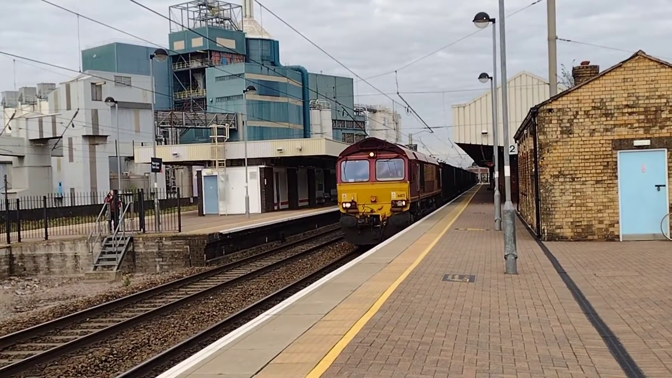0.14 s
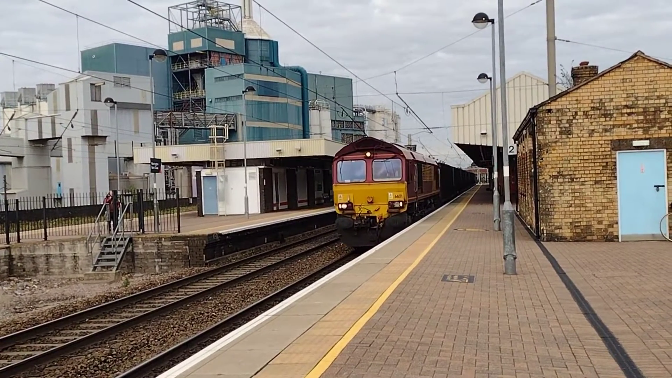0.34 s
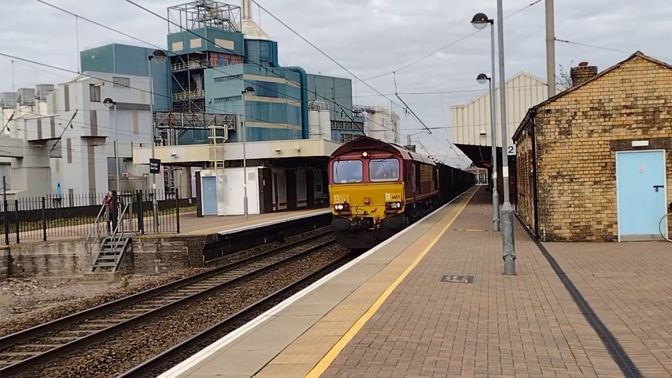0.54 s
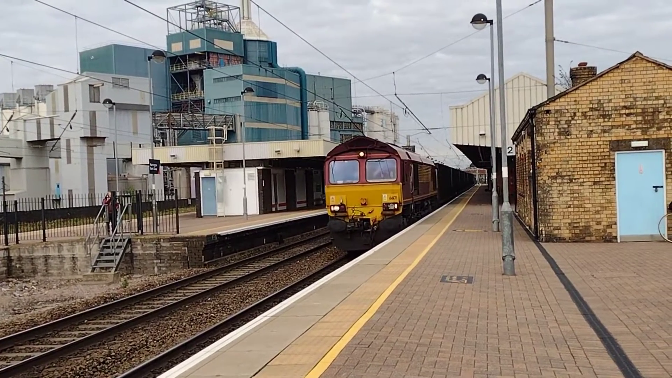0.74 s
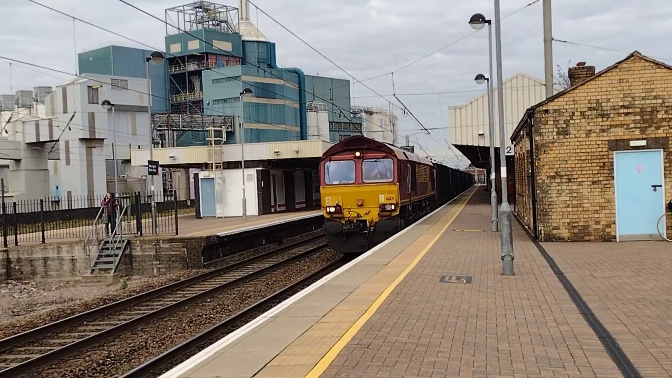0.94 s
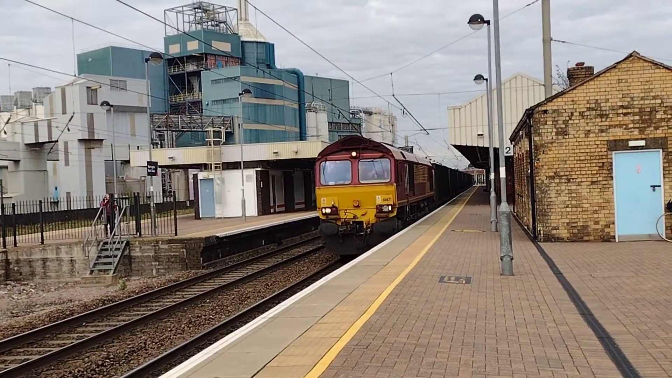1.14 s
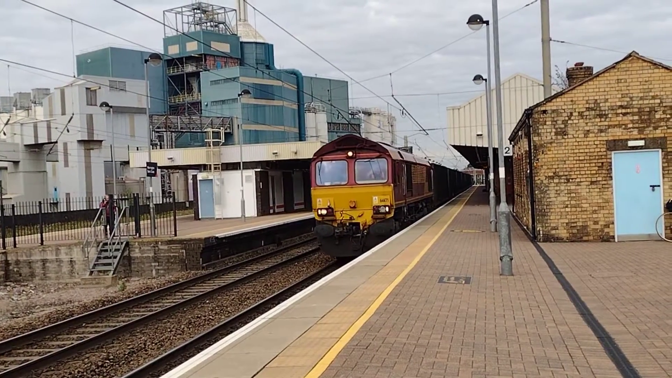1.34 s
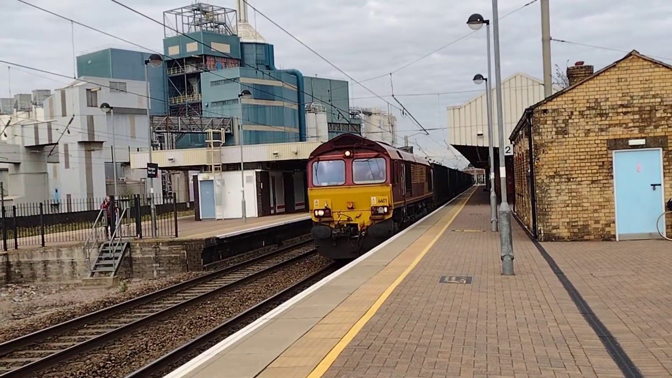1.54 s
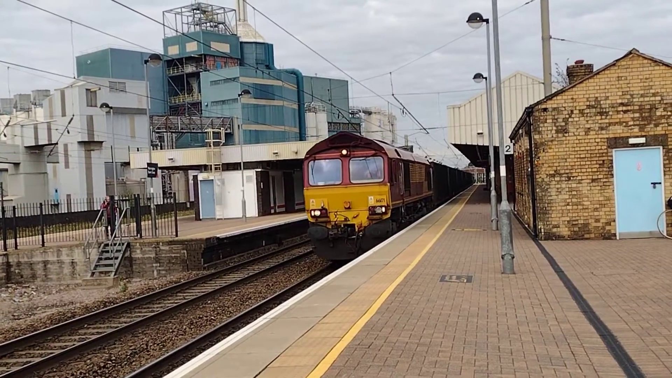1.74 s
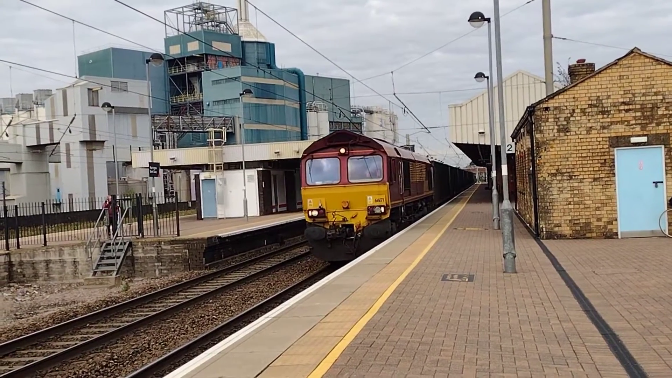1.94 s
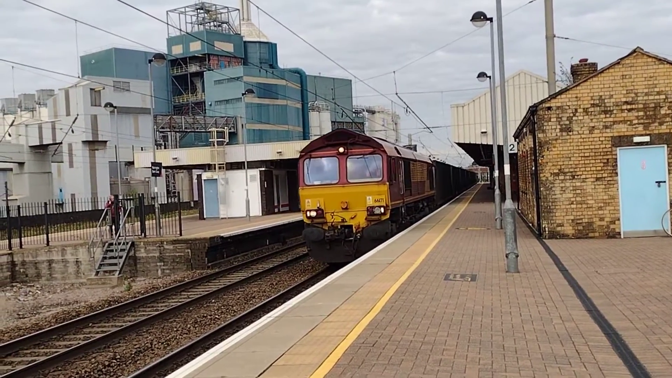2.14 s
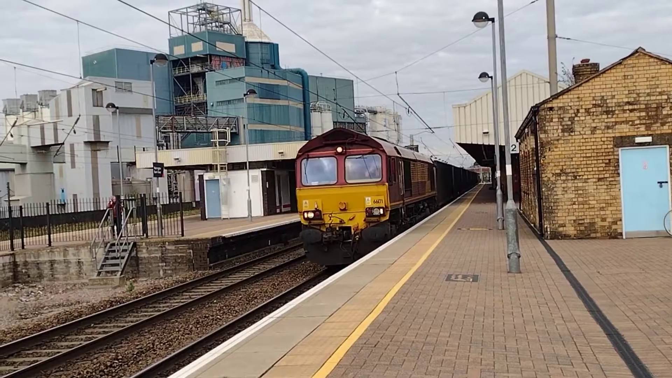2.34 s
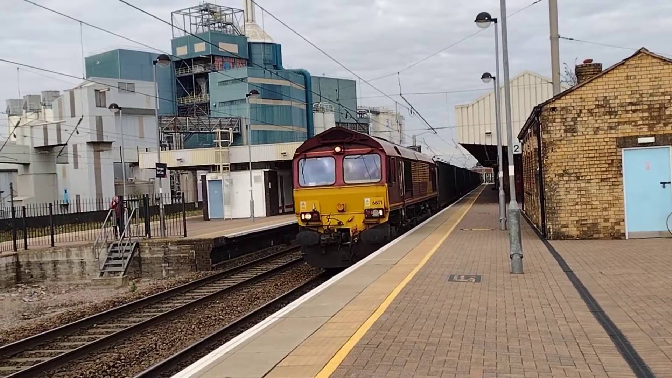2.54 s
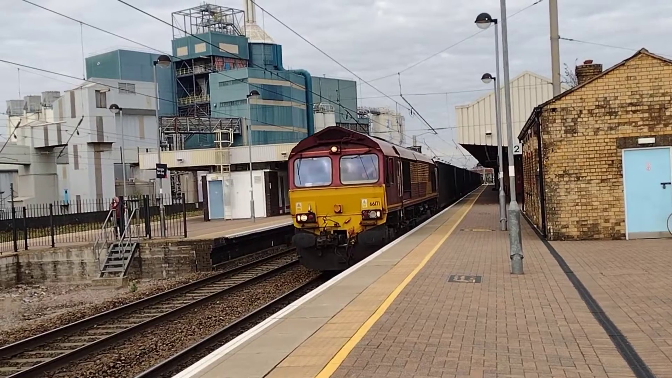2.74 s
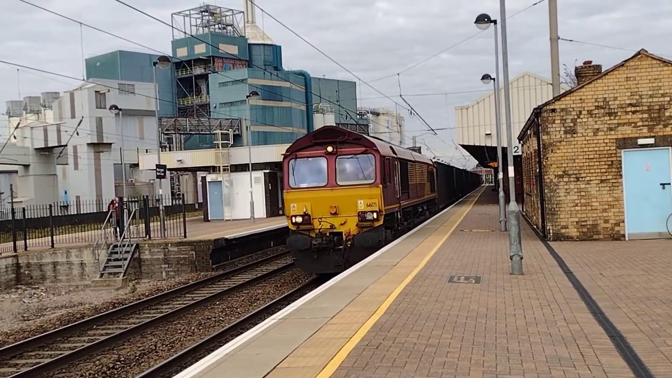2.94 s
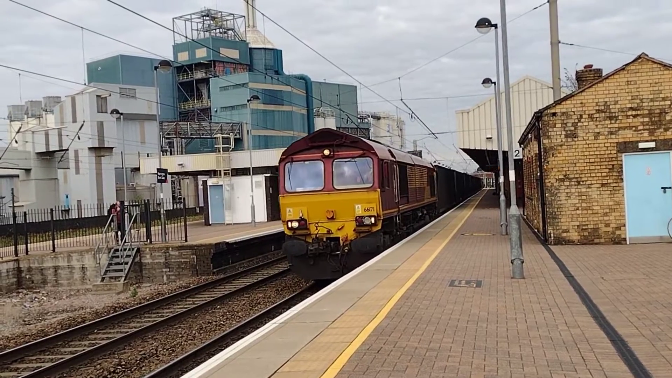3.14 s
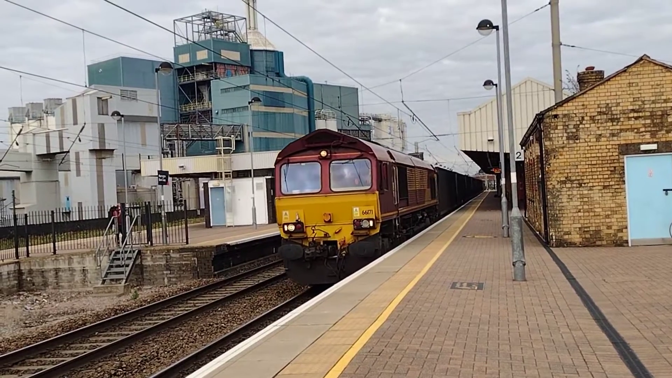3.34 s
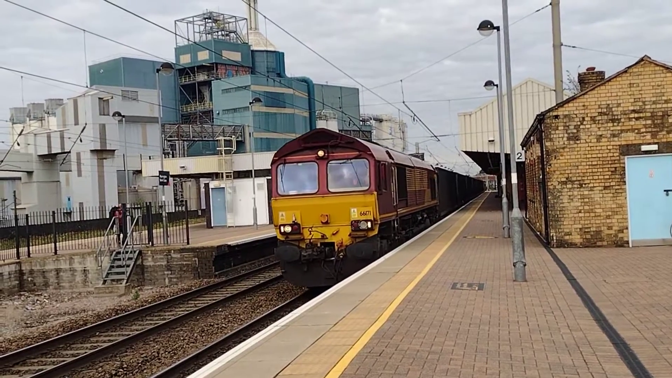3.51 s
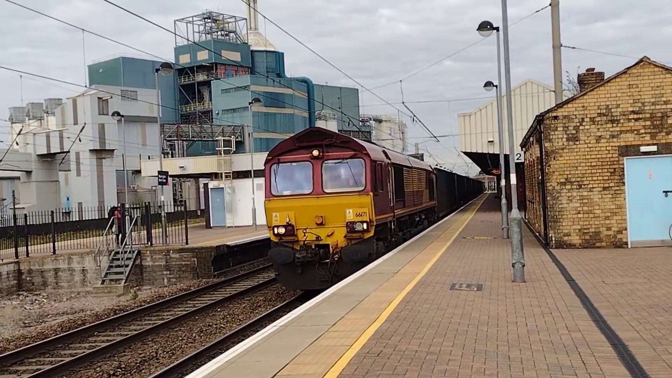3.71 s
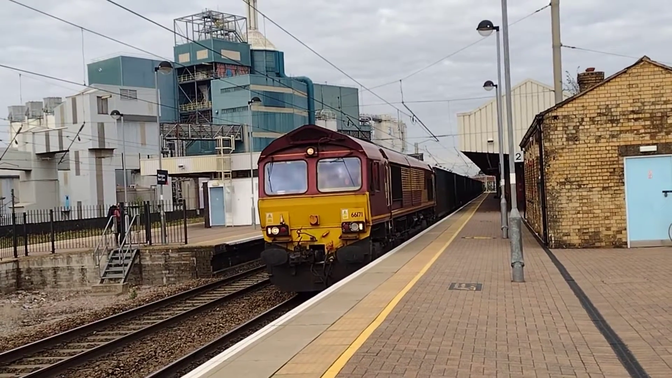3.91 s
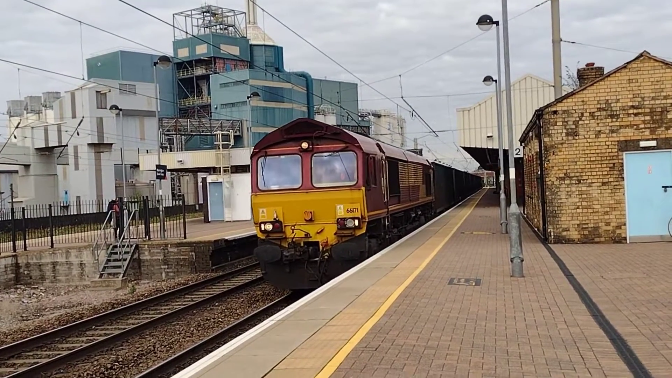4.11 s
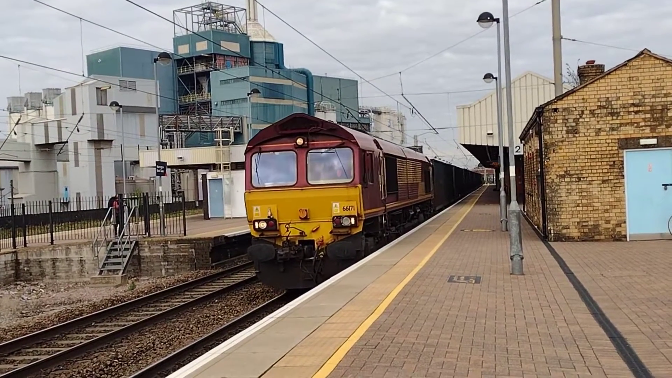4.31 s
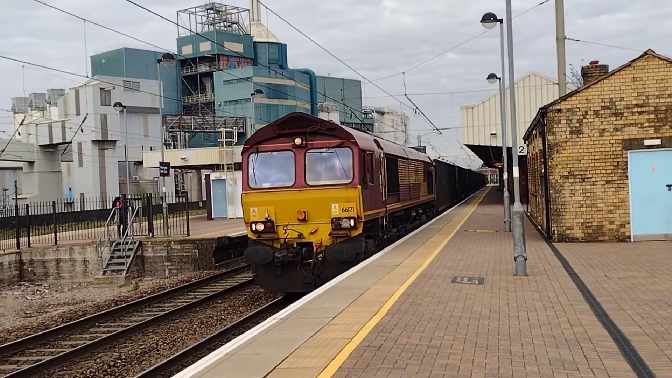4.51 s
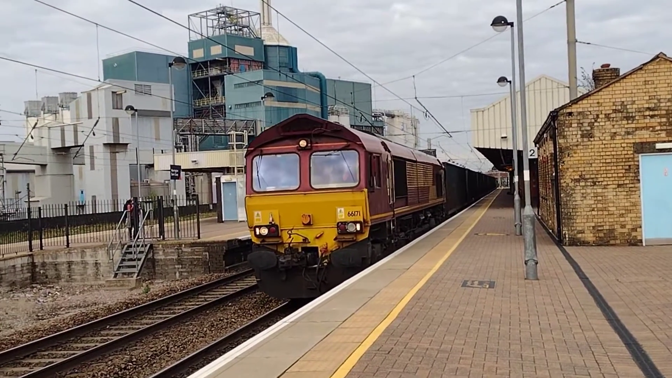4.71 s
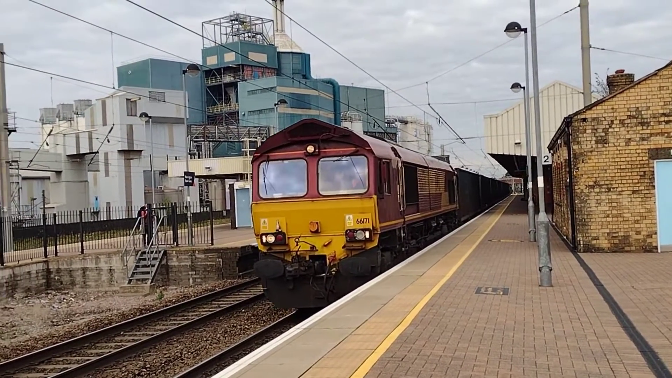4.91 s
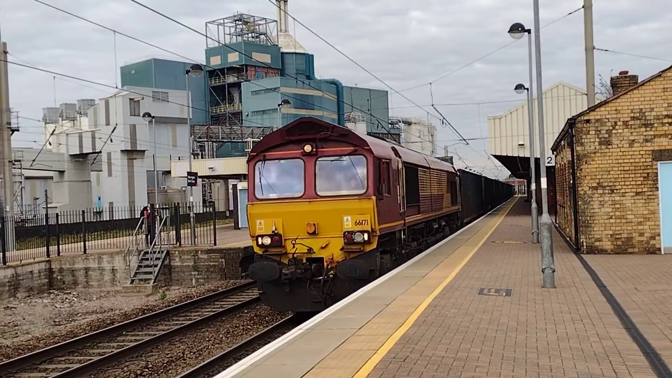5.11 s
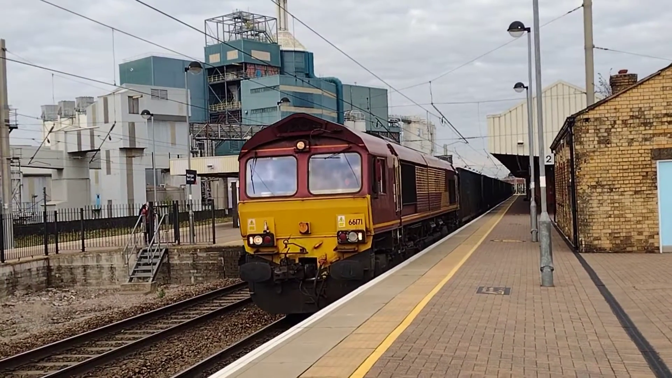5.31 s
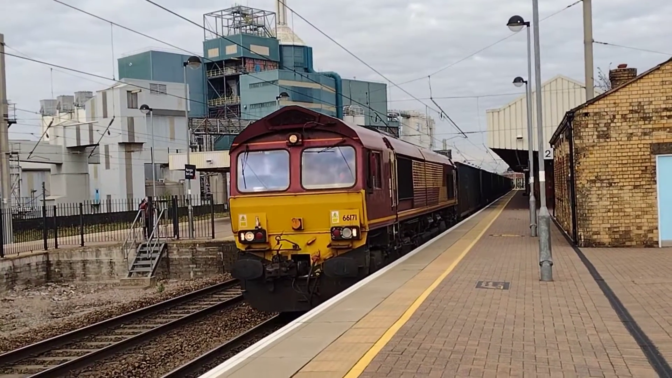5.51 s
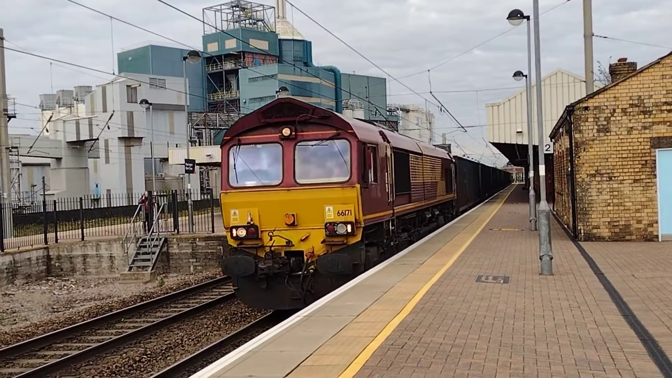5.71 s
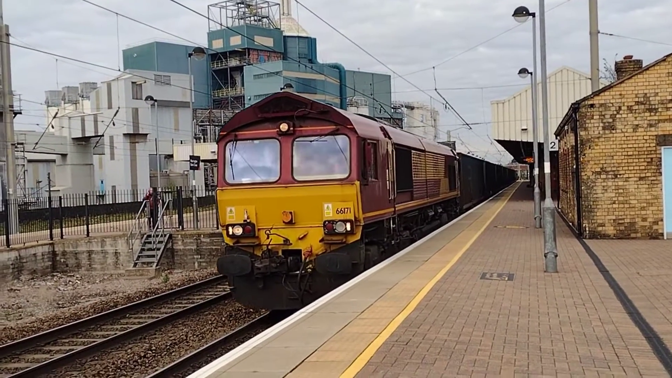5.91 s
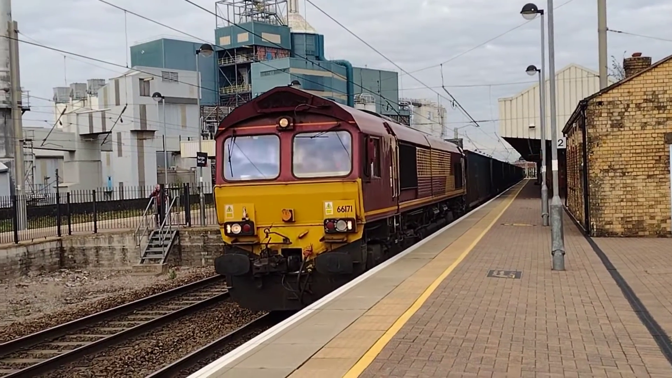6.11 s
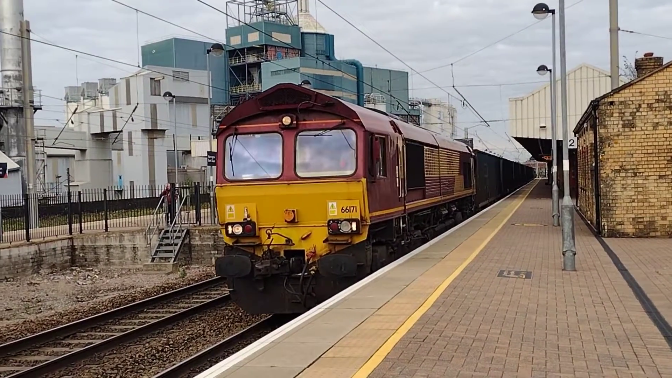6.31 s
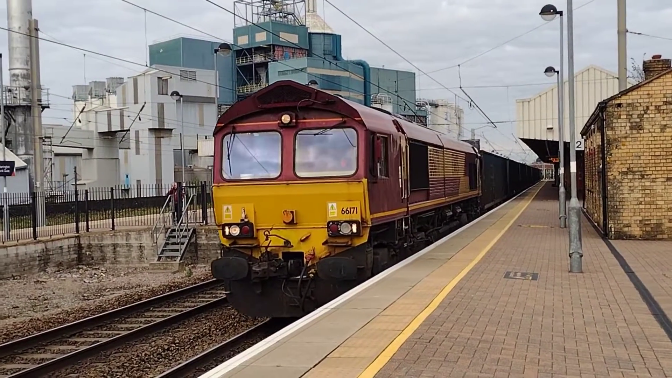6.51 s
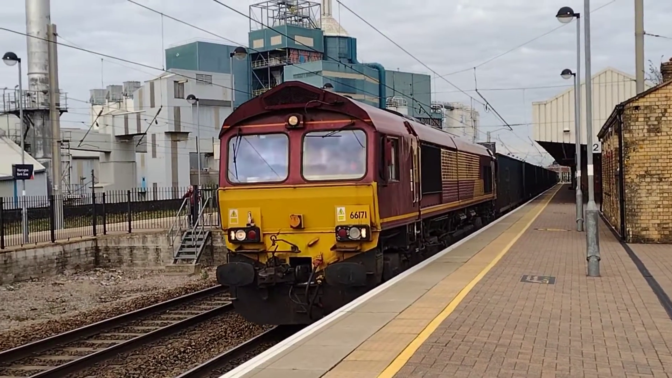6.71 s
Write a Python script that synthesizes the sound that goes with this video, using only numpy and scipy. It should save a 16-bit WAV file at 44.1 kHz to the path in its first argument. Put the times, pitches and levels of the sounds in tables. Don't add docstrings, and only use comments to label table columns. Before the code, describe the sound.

From a platform in the open air, a diesel freight locomotive is heard approaching for almost seven seconds. At 0 s a deep throbbing rumble, thin gear whine and steady rolling hiss lie beneath piercing, slightly rough wheel-flange squeals around 5 kHz. The higher squeal fades within the first half second; the lower one continues, with short chirps near 0.9, 1.1 and 1.5 s. A small, dull coupling clank sounds at about 2.2 s among softer squeals. After a faint spit of air near 2.7 s, a bright air blow-off bursts at 3.6 s, swells again near 4 s and trails away by 4.6 s. The engine roar broadens and fan rush rises. Flange squeal returns at 5.1 s, a humming blower cuts in around 5.4 s and surges near 6 s. Rumble, machinery noise and loud squeals peak at the end, 6.3 to 6.75 s, still approaching.

```python
import sys
import numpy as np
from scipy import signal
from scipy.fft import rfft, irfft, next_fast_len
from scipy.io import wavfile
from scipy.ndimage import uniform_filter1d, map_coordinates

SR = 44100
rng = np.random.default_rng(int(sys.argv[2]) if len(sys.argv) > 2 else 0)


def master_out(mix):
    frames = np.transpose(np.atleast_2d(mix))
    ceiling = np.clip(frames, -1, 1)
    pcm = np.round(ceiling * 32767).astype(np.int16)
    wavfile.write(sys.argv[1], SR, pcm)


def invert_db(x):
    u = np.asarray(x, float) / 20
    return 10 ** u


N = 297675
TIME = np.arange(N) / SR


def unit(x):
    return x / np.sqrt(np.mean(np.abs(x) ** 2) + 1e-20)


def along(points, hz):
    f, v = np.transpose(points)
    return np.interp(np.log(hz + 1), np.log(f + 1), v)


def curves(rows):
    s, *cols = np.transpose(rows)
    return [np.interp(TIME, s, c) for c in cols]


def wobble(rate):
    knots = rng.standard_normal(int(N * rate / SR) + 4)
    return map_coordinates(knots, [TIME * rate])


def filtered(x, response):
    m = next_fast_len(N + SR // 2)
    return irfft(rfft(x, m) * response(np.fft.rfftfreq(m, 1 / SR)), m)[:N]


def rush(spectrum, patchy_db):
    z = signal.stft(rng.standard_normal(N), nperseg=512)[2]
    field = uniform_filter1d(rng.standard_normal(z.shape), size=6, axis=0)
    field = uniform_filter1d(field, size=14, axis=1)
    noise = signal.istft(z * invert_db(patchy_db * unit(field)), nperseg=512)[1][:N]
    return unit(filtered(noise, lambda hz: invert_db(along(spectrum, hz))))


def sing(hz, rough, smear_hz):
    share = np.clip(rough, 0, 1)
    place = np.cumsum(7 * smear_hz * np.ones(N)) / SR
    knots = rng.standard_normal((2, 4000))
    knots = uniform_filter1d(uniform_filter1d(knots, size=4, axis=1), size=3, axis=1)
    in_phase, quadrature = [map_coordinates(k, [place % 3999], order=1) for k in knots]
    scatter = unit(in_phase + 1j * quadrature)
    turning = np.exp(2j * np.pi * np.cumsum(hz * np.ones(N)) / SR)
    return np.sqrt(2) * np.real((np.sqrt(1 - share) + np.sqrt(share) * scatter) * turning)


def burst(s, rise, hold, db, fall_db):
    since = TIME - s
    falling = invert_db(db - fall_db * np.clip(since - rise - hold, 0, None))
    return falling * np.clip(since / rise, 0, 1) ** 2


def bursts(rows):
    return np.sqrt(sum(burst(*row) ** 2 for row in rows) + 1e-14)


def heard(near, levels, nulls):
    gains = []
    for (far_db, near_db), dips in zip(levels, nulls):
        lost_db = sum(depth_db * np.exp(-((TIME - s) / width) ** 2) for s, width, depth_db in dips)
        gains.append(invert_db(far_db + near * (near_db - far_db) - lost_db))
    return gains


def crank():
    return 5.7630 - .00290 * TIME + .0009 * np.sin(2 * np.pi * (TIME - 1.1) / 6.75)


def exhaust_throb(turns, near):
    # far_db, near_db
    throb_levels = [(-52, -60.5), (-58, -49), (-50, -42.5)]
    # start_s (centre), width_s, depth_db
    throb_nulls = [
        [(0, .15, 9), (3.22, 0.37, 14)],
        [(2.5, .5, 0)],
        [(1.6, 0.44, 6), (6.9, 0.63, 5)],
    ]
    gains = heard(near, throb_levels, throb_nulls)
    return sum(gain * np.sqrt(2) * np.cos(2 * np.pi * k * turns) for k, gain in zip((6, 7, 9), gains))


def gear_mesh(shaft, turns, near):
    # far_db, near_db
    mesh_levels = [(-63, -64), (-65.5, -59.5), (-62.5, -59.5), (-61.5, -55.5)]
    # start_s (centre), width_s, depth_db
    mesh_nulls = [
        [(.3, 0.63, 8.5), (4.08, .25, 7.5), (6.2, .4, 6)],
        [(0, 0.32, 7.5), (2.3, 0.6, 12), (3.66, 0.31, 11), (4.6, 0.29, 14)],
        [(1.6, 1, 11), (3.3, 0.42, 3.5), (4.6, 0.1, 1.5)],
        [(.2, 0.76, 5.5), (2.95, 0.36, 8.5), (4.6, 0.36, 1.5)],
    ]
    gains = heard(near, mesh_levels, mesh_nulls)
    lines = [gain * sing(k * shaft, .003 * k ** .8, 6) for k, gain in zip((73, 96, 158, 237), gains)]
    runout = np.cos(2 * np.pi * (turns - .09))
    return lines[0] + lines[1] + (1 + 0.26 * runout) * lines[2] + (1 + 0.59 * runout) * lines[3]


def clear_orders(turns, near):
    order_numbers = (3, 8, 10, 13, 15, 16, 20, 21, 23, 28, 40, 43, 44, 57, 79, 83, 85, 89, 111, 114, 117,
                     120, 122, 156, 160, 234, 239)
    # far_db, near_db
    order_levels = [(-61.5, -60), (-65.5, -64), (-60.5, -62), (-64, -69), (-61.5, -55), (-61, -60),
                    (-65.5, -63), (-80, -60.5), (-63, -63), (-68.5, -61), (-64, -62), (-68.5, -60),
                    (-70, -68), (-73.5, -68.5), (-76.5, -63.5), (-94, -69), (-86, -65), (-82, -67),
                    (-69, -71), (-73, -70), (-74, -76.5), (-71.5, -73.5), (-79.5, -62), (-69.5, -66.5),
                    (-69, -68), (-70.5, -60.5), (-75.5, -72.5)]
    clear = np.zeros(N)
    for k, (far_db, near_db) in zip(order_numbers, order_levels):
        gain = invert_db(far_db + near * (near_db - far_db) + 1.6 * wobble(1.4))
        clear += gain * np.sqrt(2) * np.cos(2 * np.pi * (k * turns + rng.random()))
    return clear


def casing_comb(shaft, turns, near):
    # pitch_hz, level_db (each order)
    casing_levels = [(20, -85), (60, -76), (90, -73), (150, -72), (300, -76.5), (430, -87), (680, -76),
                     (800, -83), (1300, -87.5), (1500, -83), (2000, -120)]
    comb, size = np.zeros(N), 4096
    sizes = invert_db(along(casing_levels, np.arange(size // 2 + 1) * shaft[0]))
    for part in range(3):
        phasors = rng.standard_normal(len(sizes)) + 1j * rng.standard_normal(len(sizes))
        pattern = irfft(sizes * phasors) * size / 2
        wave = np.interp(turns % 1 * size, np.arange(size + 1), np.append(pattern, pattern[0]))
        comb += wobble(0.783) / np.sqrt(3) * wave
    return invert_db(4.54 * near) * comb


def engine():
    shaft = crank()
    turns = np.cumsum(shaft) / SR
    near = np.clip((TIME - 1.5) / 3.74, -.3, 1.05)
    return (exhaust_throb(turns, near) + gear_mesh(shaft, turns, near)
            + clear_orders(turns, near) + casing_comb(shaft, turns, near))


def exhaust_roar(exposure_db):
    # pitch_hz, level_db (per Hz)
    rumble_spectrum = [(15, -22.5), (30, 0.5), (45, -1.5), (70, -1.5), (95, 3.5), (130, -3.5), (250, -7),
                       (400, -10.5), (520, -19.5), (700, -63.5)]
    # pitch_hz, level_db (per Hz)
    drone_spectrum = [(380, -23), (500, 3), (580, 7), (680, 6.5), (740, -4), (850, -11), (1000, -43)]
    puff = 1 + 0.048 * np.cos(2 * np.pi * np.cumsum(crank()) / SR)
    rumble = invert_db(-54 + 0.39 * exposure_db) * rush(rumble_spectrum, patchy_db=0.3)
    drone = invert_db(-62 + .55 * exposure_db) * rush(drone_spectrum, patchy_db=1.4)
    return puff * (rumble + drone)


def machinery(exposure_db):
    # pitch_hz, level_db (per Hz)
    machinery_spectrum = [(400, -27.5), (700, 2), (1000, 0.5), (1250, 1.5), (1500, -1.5), (1800, -0.5),
                          (2050, -3.5), (2300, -23), (2700, -18), (3300, -49)]
    return invert_db(-63 + exposure_db) * rush(machinery_spectrum, patchy_db=1.0)


def draught():
    # pitch_hz, level_db (per Hz)
    draught_spectrum = [(1300, -25.5), (1800, 13), (2100, -3.5), (2300, -24), (2750, -29.5), (3200, 2.5),
                        (3600, 4.5), (4100, 3), (4600, -3.5), (5600, -12), (6300, -12), (7300, -3.5),
                        (7900, -14.5), (8600, -59.5)]
    full_view_s = 4.95
    facing = np.clip((TIME - 3.2) / (full_view_s - 3.2), 0, 1) ** 2
    level_db = -63.5 + 5 * (TIME - full_view_s)
    return facing * invert_db(level_db) * rush(draught_spectrum, patchy_db=1.0)


def rolling():
    # pitch_hz, level_db (per Hz)
    rolling_spectrum = [(1500, -22.5), (2000, 1.5), (2500, 2.5), (3300, 2), (4000, -3.5), (4600, -3.5),
                        (5300, -6), (6000, -9.5), (7300, -10.5), (7800, -17), (8100, -33.5), (8600, -51)]
    return invert_db(-65 + 0.38 * wobble(0.17)) * rush(rolling_spectrum, patchy_db=1.5)


def roar():
    # start_s, level_db
    exposure_points = [
        (0, -0.5),
        (1.75, 4),
        (2.5, -2.5),
        (3.05, -0.5),
        (4.0, 10),
        (4.5, 8),
        (6.0, 10),
        (6.25, 14.5),
        (6.75, 17),
    ]
    exposure_db, = curves(exposure_points)
    return exhaust_roar(exposure_db) + machinery(exposure_db) + draught() + rolling()


def squeal(grip, hz, smear_hz):
    return grip * invert_db(0.5 * wobble(25)) * sing(hz, .72, smear_hz)


def low_flange():
    # start_s, rise_s, hold_s, level_db, release_db_per_s
    low_squeals = [(-.07, 0.17, 0.96, -53, 7.5), (.845, .035, 0.02, -48, 149),
                   (1.08, 0.024, 0.036, -50, 104), (1.45, 0.032, 0.088, -56.5, 30),
                   (1.92, 0.11, .08, -59.5, 90), (2.26, 0.038, 0.03, -56, 100),
                   (2.42, 0.074, 0.16, -64, 30), (5.06, 0.07, 0.87, -53, 80), (6.1, 0.05, 0.07, -52.5, 60),
                   (6.33, 0.034, .02, -51, 150), (6.45, .05, 0.022, -53.5, 50)]
    along_rail = np.clip((TIME - 1) / 3.4, 0, 1)
    smear_hz = 60 + along_rail * (27.8 - 60)
    hz = 4799 + 12 * np.cos(2 * np.pi * TIME / 6)
    first = burst(*low_squeals[0]) * invert_db(-10.5 * np.clip(TIME - 1.8, 0, None))
    idle = invert_db(-64) * np.clip((TIME - 2.9) / 0.46, .4, 1)
    grip = np.hypot(np.hypot(first, bursts(low_squeals[1:])), idle)
    return squeal(grip, hz, smear_hz)


def high_flange():
    # start_s, rise_s, hold_s, level_db, release_db_per_s
    high_squeals = [
        (-.5, 0.86, 0.17, -51.5, 55),
        (1.2, 0.17, .1, -69.5, 30),
        (2.12, 0.25, 0.39, -66.5, 88.5),
        (3.2, .15, .05, -77, 100),
        (5.5, 0.35, 0.12, -71, 26),
        (5.85, .36, .05, -57.5, 58),
        (6.35, 0.093, .32, -48.5, 100),
    ]
    # start_s, pitch_hz, smear_hz
    high_mode = [
        (0, 5180, 40),
        (.6, 5190, 55),
        (2.2, 5150, 50),
        (2.6, 5160, 65),
        (2.8, 5240, 65),
        (5.2, 5190, 40),
        (6.2, 5150, 55),
        (6.42, 5174, 30),
        (6.75, 5176, 22),
    ]
    return squeal(bursts(high_squeals), *curves(high_mode))


def weak_wheel_modes():
    # middle_s, length_s, pitch_hz, smear_hz, level_db
    weak_modes = [(3.2, 4, 3240, 8.5, -74), (1.53, .045, 2950, 22, -60), (2.93, .04, 2965, 14, -63),
                  (3.27, .04, 2965, 14, -63), (0.76, .7, 4180, 28, -74), (6.25, .1, 4503, 10, -67),
                  (3.9, .5, 4470, 37, -74.5), (.25, .45, 5430, 22, -70), (3.5, 4, 5380, 50, -76),
                  (2.2, 3, 5900, 14, -82.5), (5.7, .3, 4610, 20, -76), (6.3, .5, 2030, 13, -65),
                  (6.55, .2, 1206, 13, -51), (6.6, 0.31, 1130, 60, -52), (6.4, 0.16, 5090, 30, -62.5)]
    faint_db = -72 + (-65.5 + 72) * np.clip((TIME - 5.1) / 1.5, 0, 1)
    song = invert_db(faint_db + 0.5 * wobble(5.3)) * sing(2958, rough=0.94, smear_hz=40.46)
    for middle, length, hz, smear_hz, db in weak_modes:
        turning = np.exp(2j * np.pi * hz * TIME)
        scatter = unit(wobble(3 * smear_hz) + 1j * wobble(3 * smear_hz))
        if length < .13:
            scatter = .8 + .6 * scatter
        swell = invert_db(db + 1.5 * wobble(3)) * np.exp(-((TIME - middle) / length) ** 2)
        song += swell * np.real(scatter * turning)
    return song


def flanges():
    return low_flange() + high_flange() + weak_wheel_modes()


def valve():
    # start_s, rise_s, hold_s, level_db (jet), release_db_per_s
    air_puffs = [
        (2.66, 0.091, 0.022, -70, 249),
        (2.8, 0.21, .1, -75, 20),
        (3.56, 0.028, .35, -56, 24),
        (3.58, 0.047, 0.061, -52.5, 60),
        (3.85, 0.17, 0.13, -53.5, 35.5),
        (4.3, 0.18, .1, -66, 18.5),
    ]
    # pitch_hz, level_db (per Hz)
    jet_spectrum = [(4300, -37.5), (5000, -2.5), (5800, -6.5), (6500, 0), (7300, 5), (7800, 0.5),
                    (8200, -16), (8500, -17), (9000, -37)]
    # pitch_hz, level_db (per Hz)
    body_spectrum = [(2300, -20.5), (2800, -10.5), (3200, -3), (3900, 2), (4400, -0.5), (4800, 0),
                     (5300, -10), (5900, -19.5), (6800, -39.5)]
    # pitch_hz, level_db (per Hz)
    pipe_spectrum = [(1000, -20), (1500, -12), (1800, 1), (2100, 4), (2300, -7), (2600, -7), (3200, -61.5)]
    blow_off = air_puffs[2:]
    blowing = bursts(blow_off)
    filling = np.clip((TIME - blow_off[0][0]) / 0.042, 0, 1)
    pipe = filling * invert_db(-56) * (blowing / blowing.max()) ** 0.63
    seep = burst(2.0, .5, 0.3, -68, 60)
    return (bursts(air_puffs) * rush(jet_spectrum, patchy_db=1.4)
            + blowing * invert_db(-1) * rush(body_spectrum, patchy_db=1.7)
            + np.hypot(pipe, seep) * rush(pipe_spectrum, patchy_db=2.0))


def coupling():
    # start_s, level_db
    clanks = [
        (2.153, -66),
        (2.18, -63.5),
        (2.25, -70),
        (2.35, -70.5),
    ]
    # pitch_hz, level_db, t60_s
    steel_modes = [(1220, -18, .5), (1263, 7, 0.45), (1460, 1, 0.74), (1890, -7, .3), (2165, 10, .4),
                   (2290, -4, 0.42), (2300, 3, 0.26), (2900, -11, .3), (3600, -7, .3), (4060, -2, 0.3)]
    out, t = np.zeros(N + SR), np.arange(SR // 2) / SR
    dull = signal.butter(3, [500, 3800], "bandpass", fs=SR)
    for s, db in clanks:
        drift = np.cumsum(rng.standard_normal((len(steel_modes), len(t))), axis=1) * .05
        ring = np.zeros(len(t))
        for (hz, level, t60), phase in zip(steel_modes, drift):
            decay = invert_db(level + rng.normal(0, 1.9) - 60 * t / t60)
            ring += decay * np.sin(2 * np.pi * hz * t + phase)
        crack = 3.1 * invert_db(-60 * t / 0.56) * signal.lfilter(*dull, rng.standard_normal(len(t)))
        out[round(s * SR):][:len(t)] += invert_db(db) * (ring + crack) * (1 - np.exp(-t / 0.0049))
    return out[:N]


def blower():
    # start_s, rise_s, hold_s, level_db, release_db_per_s
    blade_surges = [
        (5.42, 0.081, 0.024, -49.5, 150),
        (5.62, .25, .85, -50.5, 23),
        (5.95, 0.16, .03, -46, 90),
    ]
    since = TIME - blade_surges[0][0]
    on = np.clip(since / 0.1, 0, 1) * invert_db(2.5 * wobble(8))
    blade_hz = 576.3 * (1 + 0.000774 * wobble(6))
    tones = bursts(blade_surges) * sing(blade_hz, rough=0.043, smear_hz=8.3)
    tones += on * invert_db(-65 + 8.5 * since) * sing(2 * blade_hz, rough=0.97, smear_hz=12)
    tones += on * invert_db(-60.5) * sing(3 * blade_hz, rough=.6, smear_hz=16)
    tones += on * invert_db(-73.5) * sing(4 * blade_hz, rough=.4, smear_hz=14)
    return tones


def scene():
    return (engine() + roar() + flanges() + valve() + coupling() + blower())[None]


def top_cut(x):
    return signal.sosfilt(signal.butter(12, 8970, fs=SR, output="sos"), x)


def record(dry):
    band = filtered(dry[0], lambda hz: (hz < 8540) / (1 + (hz / 8380) ** 50))
    return top_cut(band[None])


dry = scene()
out = record(dry)
master_out(out)
```